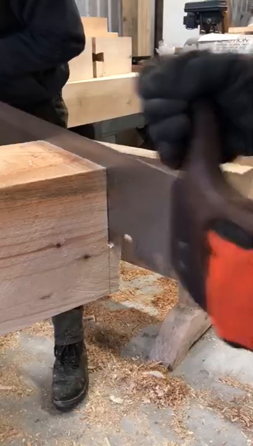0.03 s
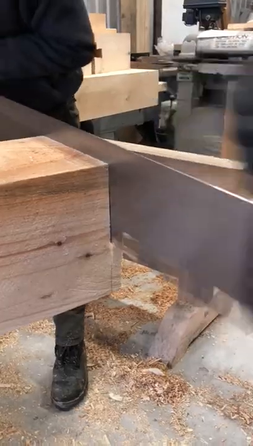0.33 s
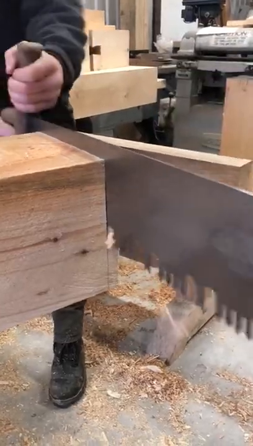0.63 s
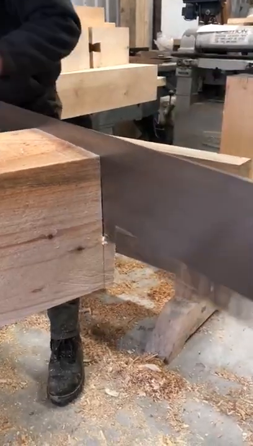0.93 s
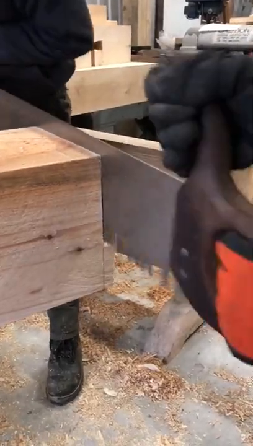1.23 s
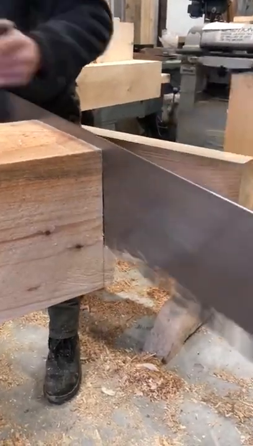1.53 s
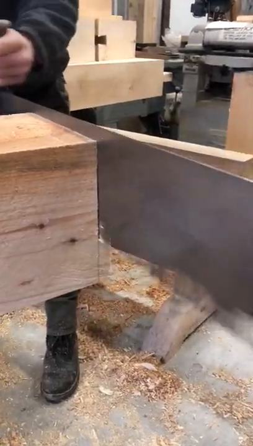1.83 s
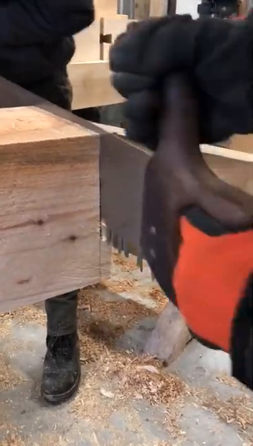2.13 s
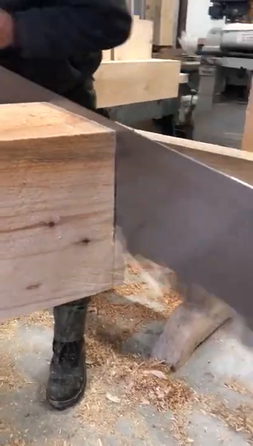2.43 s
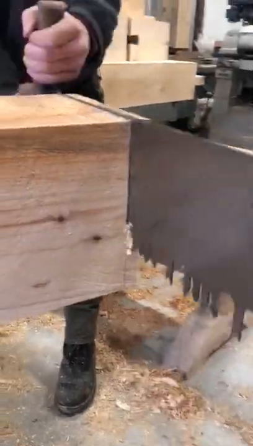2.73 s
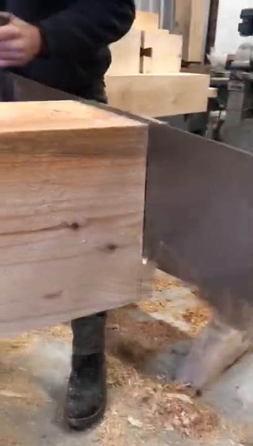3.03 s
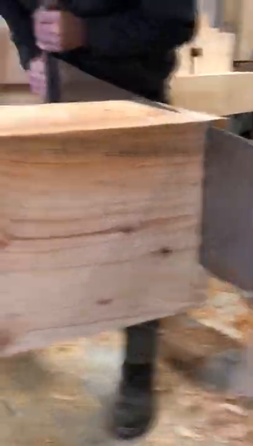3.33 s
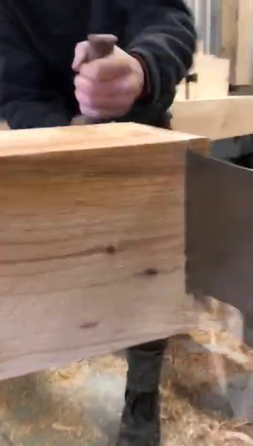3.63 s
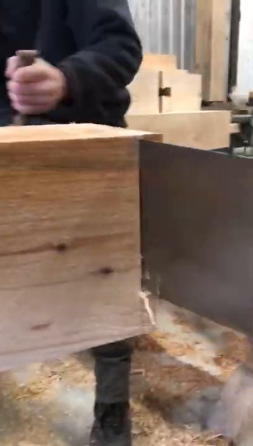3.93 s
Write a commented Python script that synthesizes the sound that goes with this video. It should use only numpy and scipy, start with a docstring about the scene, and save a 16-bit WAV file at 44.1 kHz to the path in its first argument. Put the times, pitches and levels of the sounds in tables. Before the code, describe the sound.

A long hand saw rasps steadily back and forth through a thick beam, close to the microphone. The wood resounds with each stroke, and the blade rings faintly and sometimes catches. A machine hums faintly in the workshop.

```python
"""Hand saw in a workshop

Close to the microphone, a long hand saw is pushed and pulled through a thick beam, about one stroke
every half second, starting at the end of a pull. Coarse teeth tear the fibres in a bright rasp that
knocks in the timber. The blade rings faintly and catches at some turns, chirps against the side of
the cut and sings after each push. Farther back in the room a machine hums."""
import sys
import numpy as np
from scipy import signal
from scipy.fft import rfft, irfft, next_fast_len
from scipy.io import wavfile
from scipy.ndimage import uniform_filter1d, map_coordinates

SR = 44100
rng = np.random.default_rng(int(sys.argv[2]) if len(sys.argv) > 2 else 0)


def put_to_file(sound):
    """Save the sound as 16-bit audio at rate SR, in the file named by the first command-line argument."""
    columns = np.atleast_2d(sound).T  # one column per channel
    safe = np.clip(columns, -1, 1)
    whole_steps = np.round(safe * 32767)
    wavfile.write(sys.argv[1], SR, whole_steps.astype(np.int16))


N = 176400

# Saw strokes; timber, thrum and kerf are relative to the level (start [s], fastest [s], end [s],
# level [dB], timber [dB], thrum [dB], kerf resonance [Hz], kerf [dB], direction [1 push, 0 pull])
STROKES = [(-.2, 0.001, 0.18, -16, -3, -2, 5400, -7.5, 0), (0.274, 0.56, .795, -16.5, 0, -2, 6940, -15, 1),
           (.785, 1.061, 1.254, -18, 2, -5, 4572, -12.5, 0),
           (1.278, 1.61, 1.803, -16, -1, -4, 4400, -14, 1), (1.791, 2.082, 2.296, -17, 0, -2, 4640, -8, 0),
           (2.304, 2.651, 2.825, -15, -2, -3.5, 2853, -10, 1),
           (2.804, 3.124, 3.315, -17, 1.5, 2.5, 3290, -11.5, 0),
           (3.319, 3.621, 3.844, -16, -1, 3, 2720, -12, 1),
           (3.819, 4.064, 4.02, -16.5, -1, 8, 1907, -6.5, 0)]
# Spectra of the rasp, each way, and of the beam's unpitched thrum (frequency [Hz], level [dB])
PUSH_SPECTRUM = [(300, -5), (800, -3.5), (1800, -3), (2700, -.5), (3600, -1), (5500, -0.3), (7800, 1),
                 (9200, 1.5), (11600, -6)]
PULL_SPECTRUM = [(300, -42), (800, 0), (1800, -1.5), (2700, 1.5), (3600, 1), (4600, 0), (6000, -1),
                 (9000, 2), (11600, -3)]
THRUM_SPECTRUM = [(25, -45), (70, -9), (110, -3.5), (160, -3.5), (240, 2.5), (320, -4.5), (390, -2.5),
                  (1000, -12), (2500, -3.5), (6000, -42.5)]
# Resonances of the teeth, and of the beam with the blade in it (frequency [Hz], width [Hz], level [dB])
TEETH_MODES = [(4340, 310, -15), (6535, 62, -8), (7730, 83, -11.5), (10090, 210, -2.5), (11385, 97, -3)]
TIMBER_MODES = [(100.5, 8.2, -1), (186, 14, 0), (229.6, 10.6, -5), (305.5, 20.3, -0.5), (460.8, 65, -4.5),
                (552, 60, -2.5), (667.4, 27, -1), (856.3, 15, 1.5), (1038.6, 125, -8), (1266, 116, 0.5),
                (1408, 95, 2.5), (1660, 260, -9)]
# Hum of the machine (harmonic [multiple of shaft rate], level [dB])
HUM_HARMONICS = [(2, -52), (4, -52), (5, -49), (6, -54), (7, -42.5), (8, -44.5), (14, -50.5)]
# Room tone of the workshop (frequency [Hz], level [dB])
ROOM_TONE_SPECTRUM = [(25, -25), (45, -10), (100, -12), (200, 2), (320, -1.5), (420, -7), (1200, -14),
                      (3000, -17), (6000, -23), (12000, -32)]
# Echo of the workshop (frequency [Hz], time to fall 60 dB [s])
ROOM_DECAY = [(150, 0.59), (1500, 0.46), (5000, 0.31), (12000, 0.19)]
# Steel rings at the turn of a stroke (time [s], level [dB])
TURNS = [(.30, -49), (.80, -48), (1.30, -51), (1.78, -47), (2.83, -43), (3.84, -46)]
# A tooth catches (time [s], level [dB], treble edge [Hz])
CATCHES = [(.390, -17, 7000), (0.822, -26, 9500), (3, -14, 6000), (3.461, -22, 4000), (3.850, -26, 7113),
           (3.871, -21.5, 6220), (3.91, -24, 3995), (3.942, -27, 7900)]
# The blade rubs the side of the cut (time [s], half length [s], pitch [Hz], glide [Hz/s], level [dB])
CHIRPS = [(0.539, 0.047, 760, -2200, -34), (0.676, .025, 1387, 2, -28.5), (.97, 0.028, 1300, 2, -33),
          (1.515, 0.042, 1404, -2, -34), (1.563, .05, 623, -500, -37), (2.023, 0.024, 847, -0.5, -27.5),
          (2.082, .03, 1057, 3505, -28.5), (2.686, 0.02, 1295, 2, -24), (3.10, 0.024, 1410, -1500, -36),
          (3.667, 0.065, 1285, -4, -30)]
# The free blade sings (loudest time [s], level [dB], final pitch [Hz])
SINGS = [(.63, -29.5, 500), (1.682, -32.5, 501), (2.709, -35.5, 547.6), (3.67, -29.5, 500.4)]

RISE_POWER, FALL_POWER = 1.75, 2.6  # loudness against blade speed
TIMBER_POWER, KERF_POWER = 0.83, 2.48  # the timber swells less steeply than the rasp, the kerf more
SKATE_DB, BITE_SHARE, BITE_WIDTH = -3, 0.62, 0.092  # teeth skate for this share of the rise, then dig in
TEETH_PER_S, TOOTH_SCATTER, TEAR_S = 220, 0.28, .003  # scatter is a share of the gap between teeth
TOOTH_SPREAD_DB, FIBRE_SPREAD_DB, GRAIN_DB, GRAIN_PER_S = 1.7, 1.6, .7, 26
RASP_DB, TEETH_DB, TIMBER_DB, THRUM_DB, BENDING_DB = -1.56, -5.5, -10, -15.5, -26
BENDING_HZ, SHORTENING = 502.4, 0.99  # pitch with the blade pushed out; share it rises when drawn back
START_S, LOW_CUT_HZ, TOP_HZ = .084, 42, 11800


def amp(db):
    """Decibels to gain."""
    return 10 ** (np.asarray(db) / 20)


def unit(x):
    """Scale to rms 1."""
    return x / np.sqrt(np.mean(x ** 2) + 1e-20)


def along(points, hz):
    """Read (Hz, value) points on a log frequency axis."""
    f, v = np.transpose(points)
    return np.interp(np.log(hz + 1), np.log(f + 1), v)


def clock():
    """Time of each sample in seconds."""
    return np.arange(N) / SR


def wobble(rate):
    """A smooth random curve, rate knots a second."""
    return map_coordinates(rng.standard_normal(16384), [clock() * rate], order=2, mode="wrap")


def tone(pitch):
    """A sine of rms 1 that follows a pitch curve in Hz."""
    return np.sqrt(2) * np.sin(2 * np.pi * np.cumsum(pitch) / SR)


def noise_band(pitch, width_hz):
    """Narrow noise of rms 1 around a pitch curve in Hz."""
    phase = 2 * np.pi * np.cumsum(pitch) / SR
    return unit(wobble(width_hz) * np.cos(phase) + wobble(width_hz) * np.sin(phase))


def filtered(x, response):
    """x through a band-limited response that keeps the power of white noise."""
    size = next_fast_len(N + SR // 2)
    hz = np.fft.rfftfreq(size, 1 / SR)
    gain = response(hz) * (hz < TOP_HZ + 500)
    return irfft(rfft(x, size) * gain / np.sqrt(np.mean(abs(gain) ** 2)), size)[:N]


def coloured(x, spectrum):
    """x shaped by (Hz, dB) points."""
    return filtered(x, lambda hz: amp(along(spectrum, hz)))


def rung(x, modes):
    """x through resonances of alternating polarity."""
    def response(hz):
        return sum((-1) ** k * amp(db) * 1j * hz * width / (centre ** 2 - hz ** 2 + 1j * hz * width)
                   for k, (centre, width, db) in enumerate(modes))
    return filtered(x, response)


def strokes():
    """Each stroke speeds up and slows down; its speed sets the level of every part of the cut."""
    t = clock()
    speed, push, pull, force, heave = np.zeros((5, N))
    kerf_pitches, kerf_levels = [], []
    for start, fastest, end, db, timber_db, thrum_db, kerf_hz, kerf_db, pushing in STROKES:
        pace = np.sin(np.pi / 2 * np.interp(t, [start, fastest, end], [0, 1, 0]))
        speed = np.maximum(speed, pace)
        risen = (t - start) / (fastest - start)
        skating = (1 - np.tanh((risen - BITE_SHARE) / BITE_WIDTH)) / 2
        swell = pace ** np.where(t < fastest, RISE_POWER, FALL_POWER) * amp(SKATE_DB * skating)
        if pushing:
            push += amp(db) * swell
        else:
            pull += amp(db) * swell
        force += amp(db + timber_db) * swell ** TIMBER_POWER
        heave += amp(db + thrum_db) * swell ** TIMBER_POWER
        kerf_pitches.append(kerf_hz)
        kerf_levels.append(amp(db + kerf_db) * swell ** KERF_POWER)
    kerf_pitch = np.array(kerf_pitches)[np.argmax(kerf_levels, axis=0)]  # the loudest stroke sets it
    return speed, push, pull, force, heave, kerf_pitch, sum(kerf_levels)


def tooth_bites(speed, rubbing=1.7):
    """Teeth enter the wood at a rate set by the speed; each tears for a moment, over steady rubbing."""
    passed = np.cumsum(speed + .1) * TEETH_PER_S / SR
    offset, strength = rng.standard_normal((2000, 2))[:int(passed[-1])].T
    entries = np.searchsorted(passed, np.arange(len(offset)) + TOOTH_SCATTER * offset)
    hits = np.bincount(np.clip(entries, 0, N - 1), amp(TOOTH_SPREAD_DB * strength), N)
    tearing = signal.lfilter([1], [1, -np.exp(-1 / (TEAR_S * SR))], hits)
    grip = rubbing + unit(tearing)
    running_rms = np.sqrt(abs(uniform_filter1d(grip ** 2, size=2600)))
    return grip / running_rms * amp(GRAIN_DB * wobble(GRAIN_PER_S))  # hard and soft wood


def fibres():
    """Wood fibres give way in a dense run of tiny, uneven snaps."""
    return unit(rng.standard_normal(N) * amp(FIBRE_SPREAD_DB * wobble(4500)))


def blade_bending():
    """The blade's bending mode glides up as a pull shortens its free end, and down on a push."""
    ends = [(STROKES[0][0], 0)] + [(end, 1 - pushing) for _, _, end, *_, pushing in STROKES]
    drawn_back = np.sin(np.pi / 2 * np.interp(clock(), *np.transpose(ends))) ** 2
    return noise_band(BENDING_HZ * (1 + SHORTENING * drawn_back), width_hz=70)


def cutting():
    """Close up, snapping fibres rasp, ring the teeth and kerf, shake the timber and stir the blade."""
    speed, push, pull, force, heave, kerf_pitch, kerf_level = strokes()
    grip = tooth_bites(speed)
    rasp = coloured(push * grip * fibres(), PUSH_SPECTRUM)
    rasp += coloured(pull * grip * fibres(), PULL_SPECTRUM)
    teeth = amp(TEETH_DB) * rung((push + pull) * grip * fibres(), TEETH_MODES)
    timber = amp(TIMBER_DB) * rung(force * grip * fibres(), TIMBER_MODES)
    thrum = amp(THRUM_DB) * coloured(heave * grip * fibres(), THRUM_SPECTRUM)
    kerf = kerf_level * grip * noise_band(kerf_pitch, width_hz=1200)
    bending = amp(BENDING_DB) * force * blade_bending()
    return amp(RASP_DB) * rasp + teeth + timber + thrum + kerf + bending


def workshop_echo(x, level_db=-10.5):
    """The room's echo reaches the microphone 5 ms after the direct sound; the treble dies first."""
    hz, t, noise = signal.stft(rng.standard_normal(SR // 2), SR, nperseg=256)
    decay = amp(-60 * t / along(ROOM_DECAY, hz)[:, None])
    tail = signal.istft(noise * decay, SR, nperseg=256)[1]
    delayed = np.pad(tail, (SR // 200, 0)) / np.linalg.norm(tail)
    return amp(level_db) * signal.fftconvolve(x, delayed)[:N]


def machine_hum(shaft_hz=23.1):
    """In the background a machine throbs on multiples of its slightly wandering shaft rate."""
    revolutions = np.cumsum(shaft_hz * (1 + 0.0024 * wobble(2.73))) / SR
    return sum(amp(db) * np.sqrt(2) * np.sin(2 * np.pi * (multiple * revolutions + rng.random()))
               for multiple, db in HUM_HARMONICS)


def room_tone(level_db=-41):
    """Dull, steady noise fills the workshop."""
    return amp(level_db) * coloured(rng.standard_normal(N), ROOM_TONE_SPECTRUM)


def steel_ring(pitch_hz=2370, half_s=.05):
    """The steel gives a thin ring as the blade changes direction."""
    level = sum(amp(db) * np.exp(-((clock() - time) / half_s) ** 2) for time, db in TURNS)
    return level * tone(pitch_hz + 6 * wobble(60))


def tooth_catches(decay_s=.004, knock_db=-6):
    """A tooth snags early in a stroke: a short crack and a knock in the beam."""
    out = np.zeros(N)
    for time, db, edge_hz in CATCHES:
        t = clock() - time
        burst = amp(db) * (t >= 0) * np.exp(-abs(t) / decay_s) * rng.standard_normal(N)
        crack = filtered(burst, lambda hz: 1 / (1 + 1j * hz / edge_hz) ** 2)
        out += crack + amp(knock_db) * rung(burst, TIMBER_MODES)
    return out


def blade_chirps(drift_hz=44.4):
    """The blade rubs the side of the cut in brief, rough tones."""
    out = np.zeros(N)
    for time, half_s, hz, glide, db in CHIRPS:
        near = abs(clock() - time) < 4 * half_s
        t = clock()[near] - time
        drift = map_coordinates(rng.standard_normal(256), [(t - t[0]) * 200], order=1)
        out[near] += amp(db) * np.exp(-(t / half_s) ** 2) * tone(hz + glide * t + drift_hz * drift)
    return out


def blade_song(rise_s=0.072, fade_db_per_s=65, sag_hz=80, sag_s=.12):
    """Late in a push the free blade sings, sagging in pitch as it slows."""
    out = np.zeros(N)
    for loudest, db, final_hz in SINGS:
        t = clock() - loudest
        pitch = final_hz + sag_hz * (1 - np.tanh(t / sag_s + .5)) / 2
        envelope = np.where(t < 0, np.exp(-abs(t) / rise_s), amp(-fade_db_per_s * abs(t)))
        flutter_db = 2.6 * wobble(29.34)
        out += amp(db + flutter_db) * envelope * tone(pitch)
    return out


def scene():
    """One microphone close to the beam: the saw in front, the workshop behind."""
    saw = cutting() + tooth_catches() + blade_chirps()
    return (saw + workshop_echo(saw) + steel_ring() + blade_song() + machine_hum() + room_tone())[None]


def record(dry):
    """The sound cuts in abruptly; the microphone drops the deepest bass and the highest treble."""
    low_cut = signal.butter(4, LOW_CUT_HZ, "high", fs=SR, output="sos")
    heard = signal.sosfilt(low_cut, dry) * (clock() >= START_S)
    size = next_fast_len(N + SR // 2)
    hz = np.fft.rfftfreq(size, 1 / SR)
    high_cut = 1 / np.sqrt(1 + (hz / TOP_HZ) ** 260)
    return irfft(rfft(heard, size) * high_cut, size)[:, :N]


dry = scene()
out = record(dry)
put_to_file(out)
```